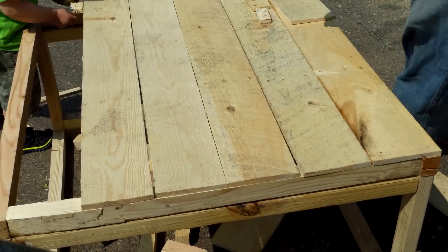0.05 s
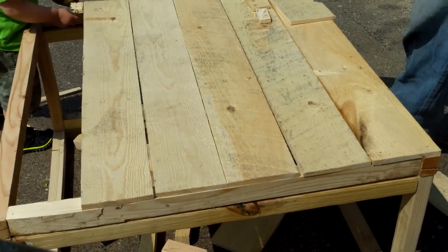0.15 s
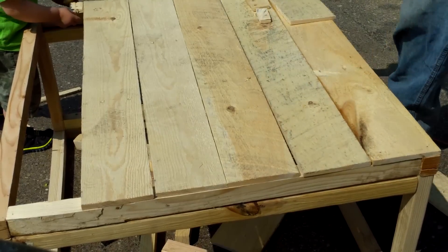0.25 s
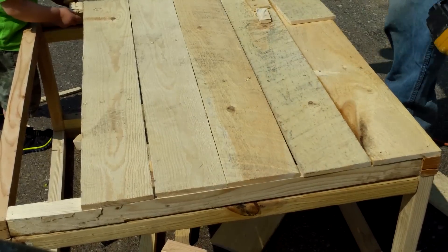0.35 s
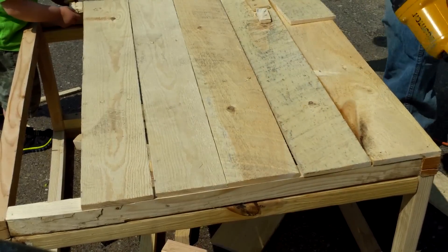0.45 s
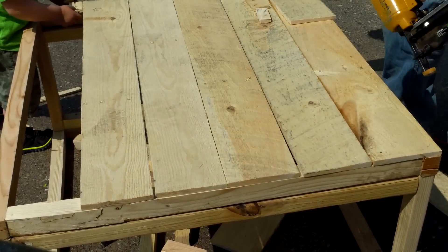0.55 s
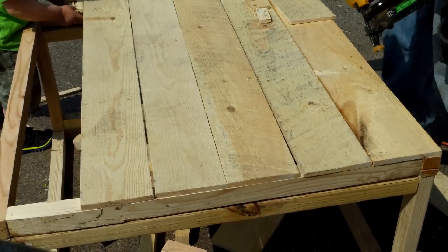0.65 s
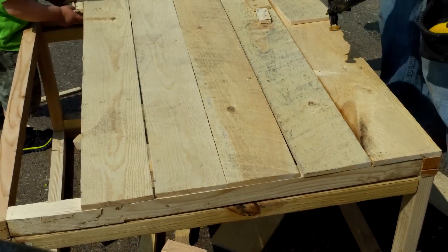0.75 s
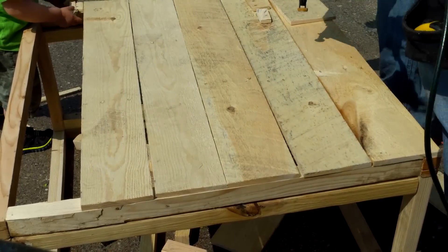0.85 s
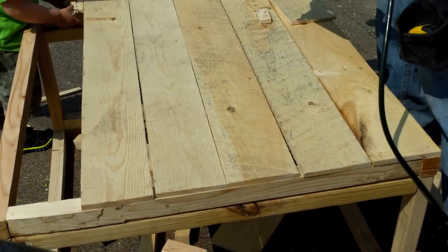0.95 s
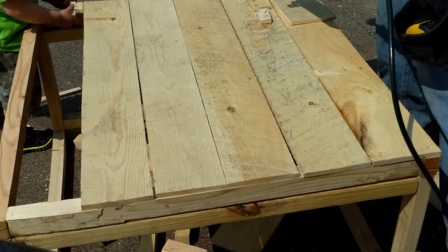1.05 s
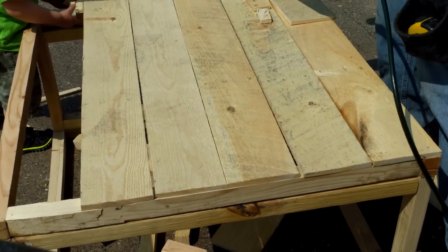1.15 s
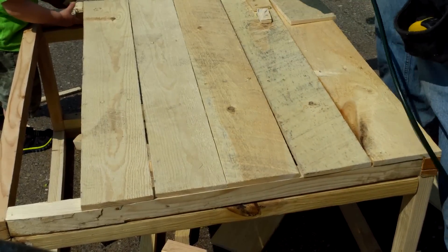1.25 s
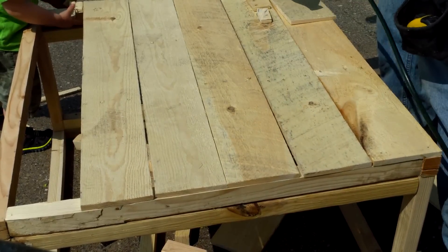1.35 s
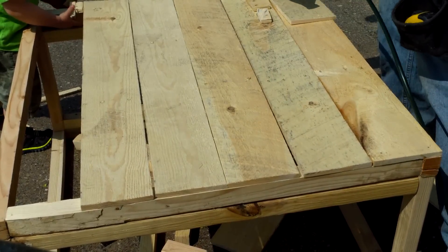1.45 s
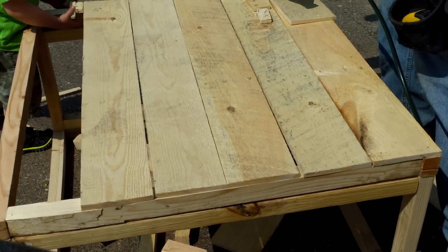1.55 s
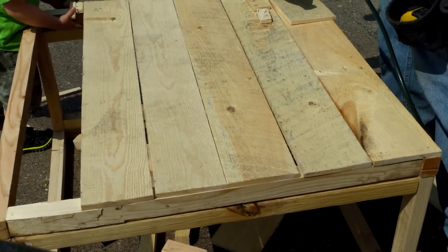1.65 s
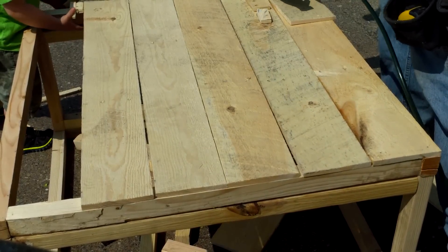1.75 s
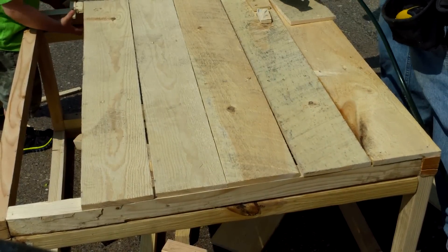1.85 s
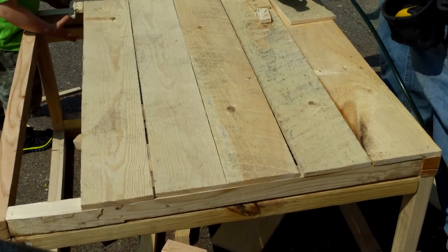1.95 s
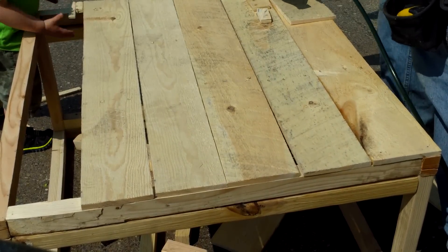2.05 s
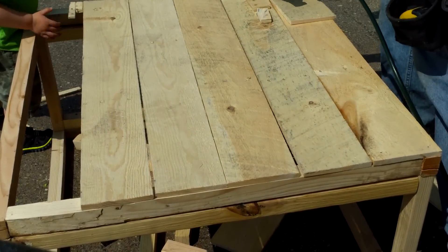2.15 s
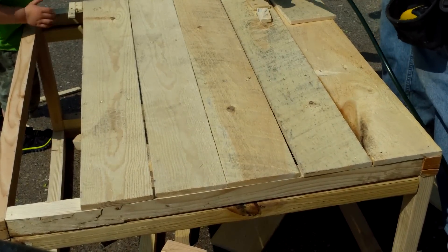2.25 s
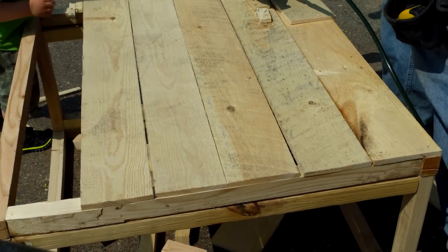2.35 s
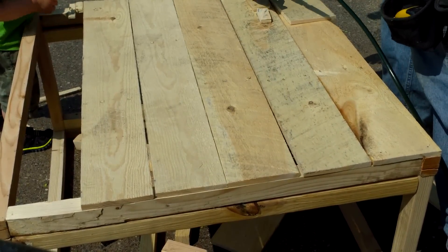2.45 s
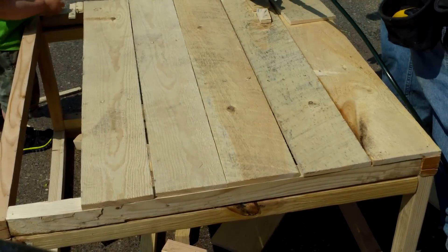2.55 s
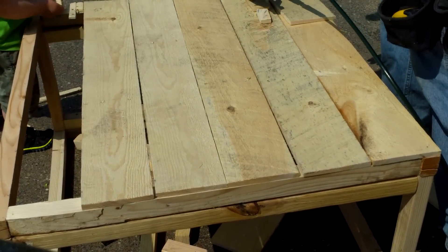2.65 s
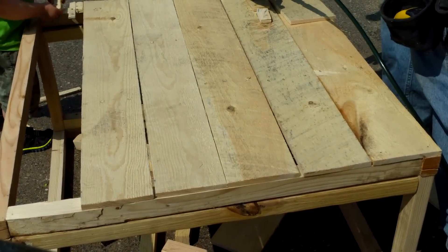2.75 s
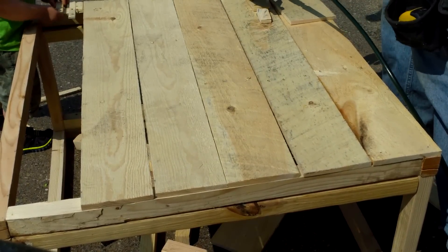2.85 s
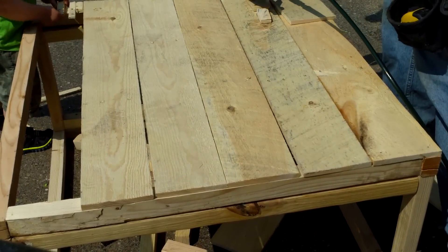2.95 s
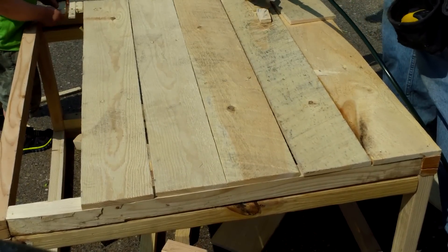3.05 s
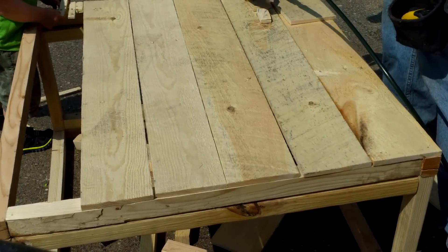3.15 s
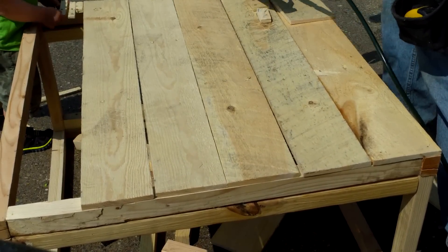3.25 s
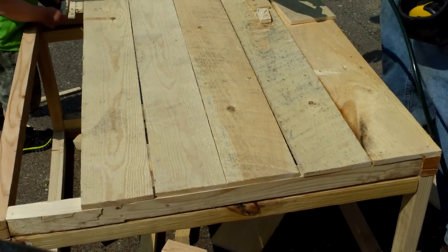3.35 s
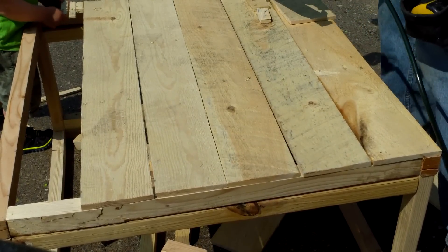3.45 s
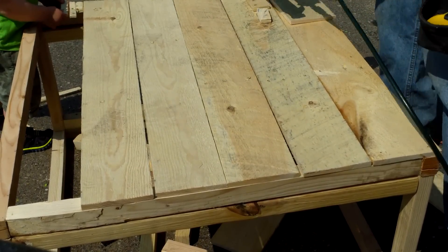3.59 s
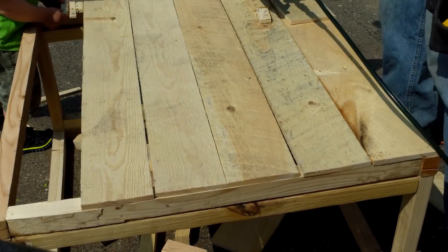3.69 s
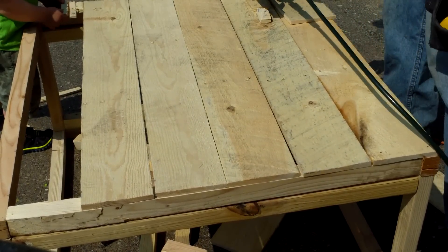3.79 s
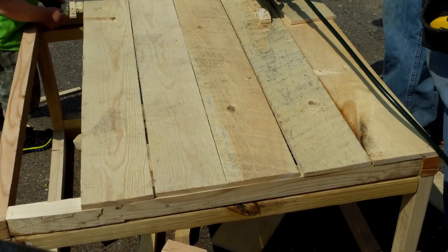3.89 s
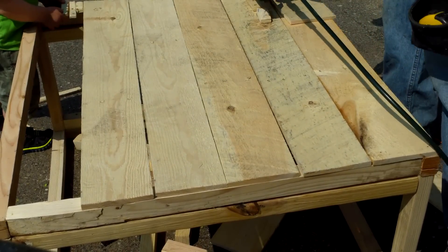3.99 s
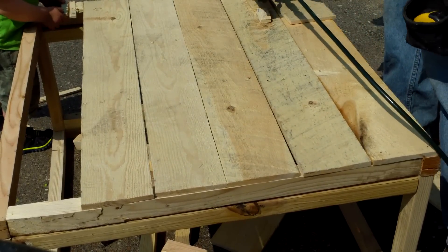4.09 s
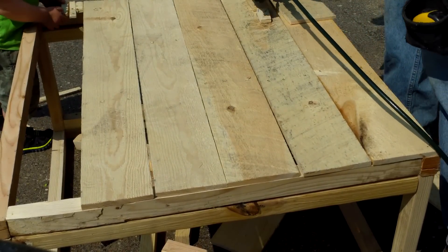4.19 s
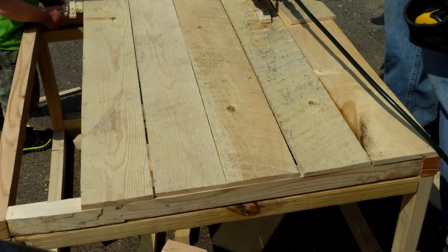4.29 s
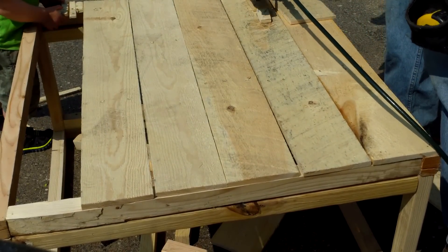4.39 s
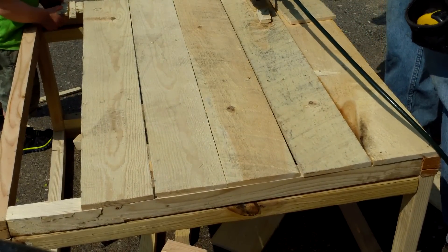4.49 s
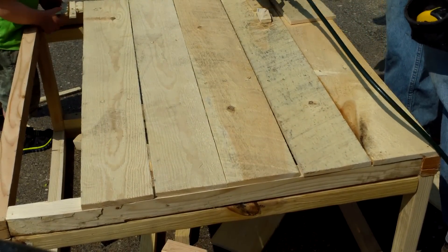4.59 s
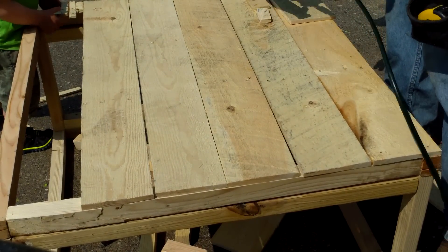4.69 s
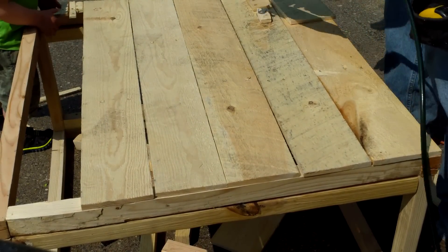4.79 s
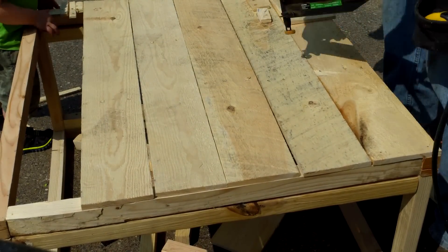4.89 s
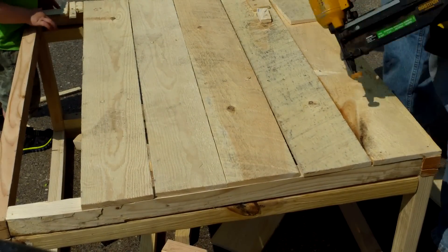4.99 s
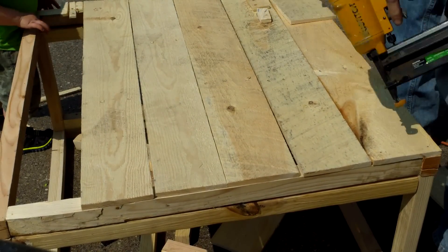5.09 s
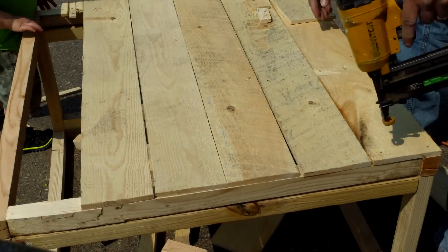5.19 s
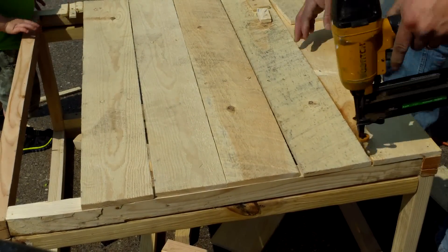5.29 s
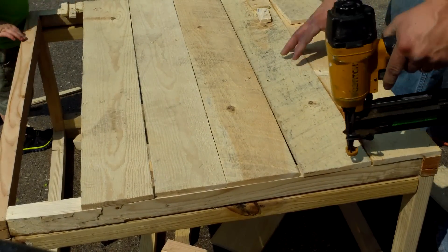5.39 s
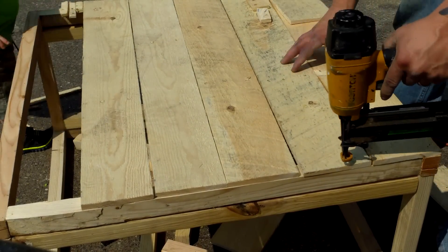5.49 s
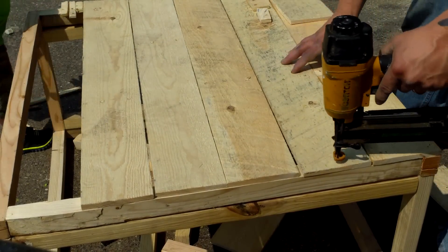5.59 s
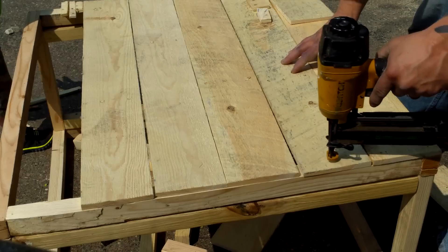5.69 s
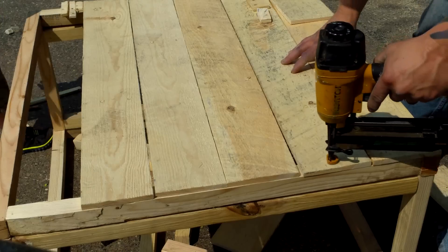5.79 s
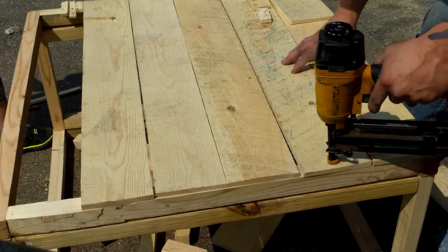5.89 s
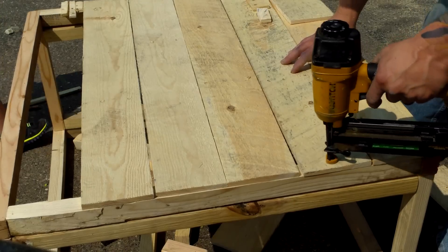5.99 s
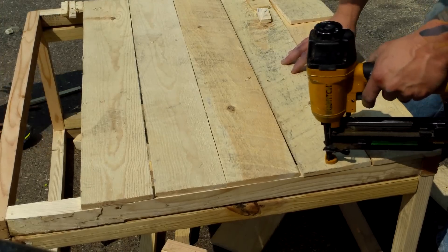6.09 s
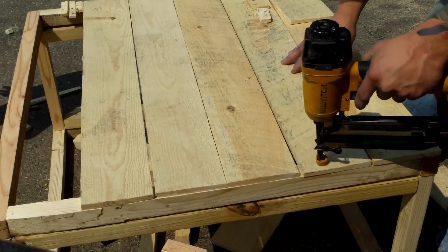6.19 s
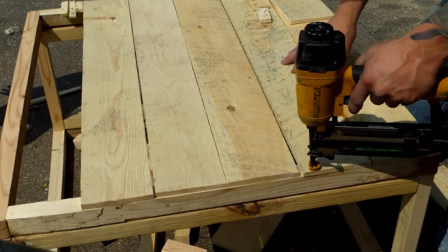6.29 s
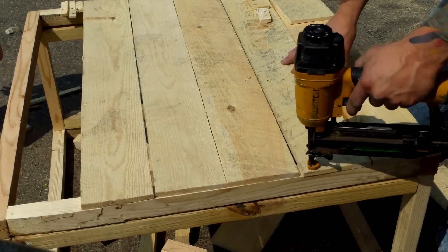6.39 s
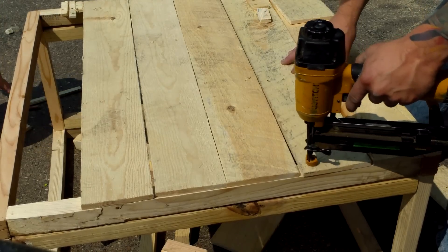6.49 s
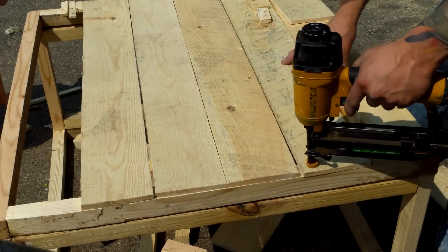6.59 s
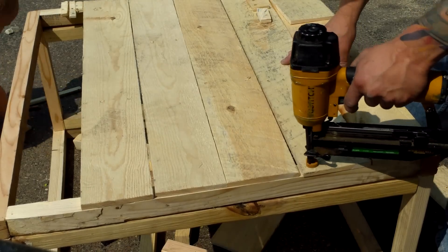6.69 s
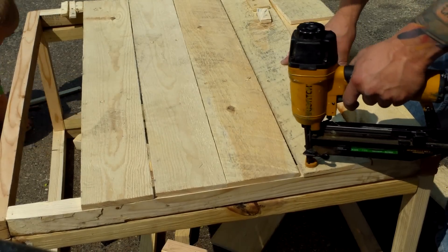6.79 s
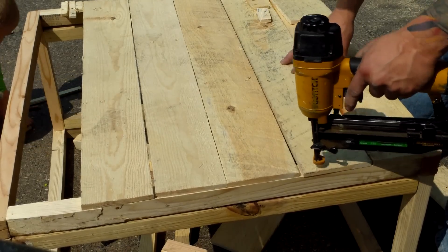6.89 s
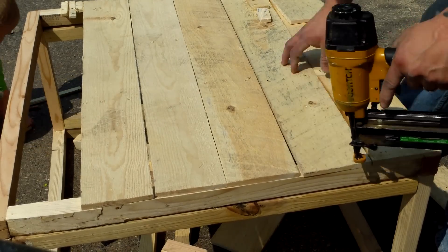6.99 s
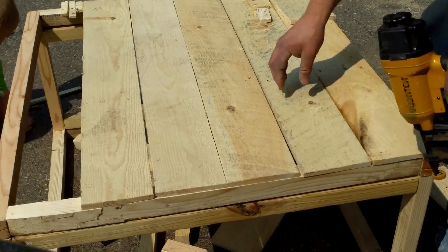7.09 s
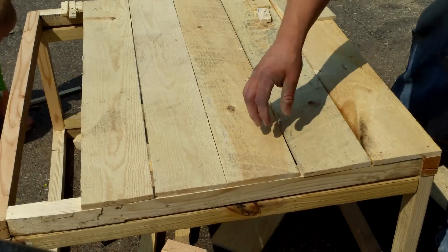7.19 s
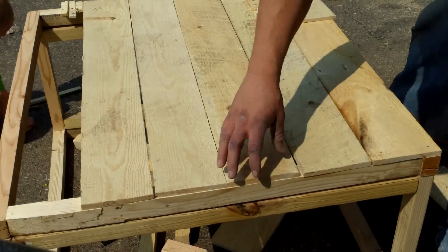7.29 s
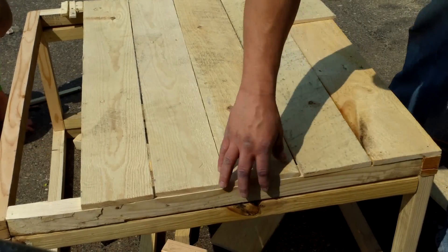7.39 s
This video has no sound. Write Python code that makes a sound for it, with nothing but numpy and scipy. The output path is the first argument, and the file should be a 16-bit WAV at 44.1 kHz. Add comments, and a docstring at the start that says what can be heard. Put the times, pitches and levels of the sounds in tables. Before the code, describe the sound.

Outdoors, close to a timber frame, the sound opens subdued with a wisp of dying air; a faint low engine drone and distant traffic swell up by about 0.5 s. From 0.65 to 1.1 s the tool's nose and hose knock, tick and scuff on the boards, with another knock at 1.8. A pneumatic nailer fires at 2.1, 3.3, 4.6, 6.2 and 6.9 s. Each shot is a brief inrush of air and valve knock, then two cracks almost fused, with short ringing wood and a little steel. About 0.15 s later comes a trigger click and a loud, bright, very short exhaust blast ending in a piston clack. The background ducks at every shot, then returns, growing fainter overall. Small knocks, ticks and soft rubbing fill the gaps, especially 5.3 to 6.1 s. After the last exhaust at 7.07 s, a thin metallic ring lingers. Echo is slight.

```python
"""On a timber frame outdoors, a pneumatic nailer drives five nails into boards.
Each shot is an inrush of air, a valve knock, two cracks of the driver and ringing wood and steel; then the
trigger clicks back and the exhaust blasts. Impacts are shaped noise plus decaying sines; air is shaped noise.
Between shots the tool knocks and rubs on the wood; an engine (wavering sines) and traffic drone far off.
Far sounds, rubbing and faint ticks sink at every shot, stay low for a moment and swell back."""
import sys
import numpy as np
from scipy import signal
from scipy.fft import rfft, irfft, next_fast_len
from scipy.io import wavfile

SR = 44100
rng = np.random.default_rng(int(sys.argv[2]) if len(sys.argv) > 2 else 0)


def file_out(sig):
    """Save sig as 16-bit WAV at sys.argv[1]."""
    # one column per channel
    cols = np.atleast_2d(sig).T
    # limit, then scale
    lim = np.clip(cols, -1, 1)
    pcm = np.round(lim * 32767).astype(np.int16)
    wavfile.write(sys.argv[1], SR, pcm)


N = 328104
TIME = np.arange(N) / SR   # [s]
AGE = np.arange(SR // 2) / SR   # time since the onset of one event [s]

# Levels in the tables are relative; the functions trim them further.
# Far sounds over time: (time [s], traffic level [dB], engine and rumble level [dB])
FAR_LEVELS = [(.7, -45, -31), (2.0, -46, -35.5), (3.0, -50, -38.5), (4.3, -52, -43), (5.8, -53.5, -44.5),
              (7.3, -57, -43.5)]
# Spectrum of distant traffic: (frequency [Hz], density [dB per Hz])
STREET_COLOUR = [(76, -28), (130, 5), (202, -3.5), (285, -5.5), (410, -6.5), (444, -9), (765, -3),
                 (935, -3), (1640, -8.5), (3990, -28), (8070, -32), (9670, -32), (16000, -37.5)]
# Spectrum of the low rumble: (frequency [Hz], density [dB per Hz])
RUMBLE_COLOUR = [(12, -37.5), (20, -7.5), (38, 4.5), (97, -4), (109, -4), (130, -30), (160, -18.5),
                 (210, -37.5), (350, -120)]
# Spectrum of the faint steady hiss: (frequency [Hz], density [dB per Hz])
HISS_COLOUR = [(59, -19.5), (100, 4), (119, -17), (350, -25.5), (854, -26), (991, -24.5), (16000, -34.5)]
# Tones of the far engine: (frequency [Hz], level [dB], waver as a share of the frequency [1])
ENGINE_TONES = [(92.9, -1.5, .018), (59.2, -8.5, 0.043), (205, -18, 0.0066)]
# Thin far whines: (lower edge [Hz], upper edge [Hz], level [dB])
WHINE_BANDS = [(7480, 7720, -27), (8520, 8620, -27)]
# Lull of the background: depth, and time constants of sinking and swelling back
LULL_DB, SINK_S, SWELL_S = -23, 0.0088, 0.072
FIRST_LULL_ENDS_S = 0.45   # the scene opens in a lull

# Spectrum of air bleeding out slowly: (frequency [Hz], density [dB per Hz])
BLEED_COLOUR = [(500, -12.5), (3000, -12.5), (5500, -6), (6800, -6.5), (7700, -4.5), (8400, -12),
                (9600, -0.5), (11500, -10), (15500, -19.5)]
# Spectrum of the thin tail scattered by the yard: (frequency [Hz], density [dB per Hz])
YARD_COLOUR = [(100, 7.0), (600, 6.5), (2000, 0.5), (5000, 0.5), (10000, -1), (16000, -4)]
# Low, barely audible pressure swells: (time of the peak [s], level [dB], time from peak to 1/e [s])
LOW_SWELLS = [(.03, -44, .11), (7.38, -33, .11)]
# Spectrum of the low swells: (frequency [Hz], density [dB per Hz])
LOW_SWELL_COLOUR = [(5, 0), (15, -6), (35, -14), (70, -26), (150, -42), (400, -62), (5000, -100)]

# Knocks of nose and hose on the boards:
# (time [s], wooden level [dB], metal tick level [dB], scuff level [dB], fade to 1/e [s])
KNOCK_EVENTS = [(0.6515, -38, -45, -44.5, 0.015), (0.7109, -32.5, -40, -31, 0.0037),
                (0.7287, -35, -62, -47, 0.016), (0.8764, -32.5, -28.5, -32, 0.0065),
                (0.9468, -57, -52, -38, 0.0099), (1.0049, -56, -40, -62, 0.005),
                (1.05, -39, -71, -68, .0071), (1.1106, -26.5, -38, -42.5, 0.0078),
                (1.828, -39, -35, -36, 0.012), (2.651, -50, -51, -55, 0.017),
                (3.1564, -42, -52.5, -54.5, 0.0095), (4.414, -48.5, -42.5, -56, 0.0033),
                (4.5342, -49, -45, -56, 0.011), (5.0377, -54, -59, -80, .0042),
                (5.3561, -43, -43.5, -44, 0.012), (5.5043, -47, -44.5, -47, 0.022),
                (5.9479, -44, -62, -38.5, .014), (6.0111, -48.5, -51, -66, .012),
                (6.1063, -42, -51.5, -43.5, 0.015), (6.7616, -61, -55, -53.5, 0.006),
                (6.8364, -51, -70, -78, .0078)]
# Spectra of wooden knock, metal tick and scuff, in that order: (frequency [Hz], density [dB per Hz])
KNOCK_SPECTRA = [
    [(200, -6.5), (600, -4.5), (950, 1.5), (1500, -1.5), (2300, -3), (4000, -10.5), (15000, -37)],
    [(1500, -24), (2800, -7), (3500, -9), (4100, -6.5), (4900, -10), (5600, 0), (6300, -4.5), (6900, -9),
     (7500, -2), (8600, -19), (15000, -25)],
    [(3000, -29), (7500, -8.5), (9600, 3.5), (11500, -7.5), (15500, -17.5)],
]
# Strokes of rubbing hose and clothes: (time of the peak [s], level [dB], fade to 1/e [s])
RUB_STROKES = [(.69, -48.5, 0.031), (.9, -43, 0.023), (1.66, -59.5, 0.055), (1.82, -47, 0.057),
               (3.12, -66, 0.093), (5.39, -55.5, 0.078), (5.94, -51, .09), (6.13, -50, 0.035),
               (7.0, -44.5, 0.067)]
RUB_REST_DB = -67.5   # between strokes
# Spectrum of the rubbing: (frequency [Hz], density [dB per Hz])
RUSTLE_COLOUR = [(1470, -37), (2500, -7), (4730, -6.5), (6060, -4), (8270, -8), (9360, 0), (16000, -17)]
# Faint ticks at chance times
TICK_COUNT, TICK_SPREAD_DB, TICK_FADE_S = 30, 4, 0.0042
# Parts of one faint tick: (wooden level [dB], metal level [dB], scuff level [dB])
TICK_LEVELS = (-58, -57, -59)
# Modes of the boards: (frequency [Hz], level [dB], decay by 60 dB [s])
BOARD_MODES = [(231.8, -22, 0.029), (414, -19.5, 0.018), (690, -18, 0.036), (794, -14, 0.033),
               (950, -20.5, .1), (1135, -18.5, 0.11), (1300, -8.5, 0.046), (1605, 3, 0.024),
               (1755, -1, .025), (2030, 2.5, 0.024), (2080, -7, 0.0092), (2548, -5.5, 0.027),
               (2890, -5.5, 0.023)]

# Shots: (time [s], air level [dB], crack level [dB], wood level [dB], note of that spot on the boards [Hz],
# note level [dB], steel level [dB], driver's ping level [dB], end of the lull after the strike [s])
SHOT_EVENTS = [(2.1096, -21, -13.5, -16.5, 1695, -20.5, -33, -41.5, 0.43),
               (3.2810, -20.5, -14.5, -7.5, 1268, -17.5, -33, -40, 0.61),
               (4.6294, -22, -15, -14, 1587, -18.5, -34.5, -51.5, 0.41),
               (6.1751, -23, -13, -15, 1417, -18.5, -35, -26.5, 0.53),
               (6.923, -23.5, -12, -15.5, 1750, -21, -33, -26.5, 0.2)]
# Delays from the driver's strike, the same at every shot
INRUSH_AT_S, VALVE_AT_S, HOME_AT_S = -.0233, -.0183, .0036
# Spectrum of the air inrush: (frequency [Hz], density [dB per Hz])
INRUSH_COLOUR = [(150, -21.5), (900, -29), (1400, -25), (2000, -22), (2900, -12.5), (4300, -14),
                 (5300, -16), (6200, 1.5), (6900, -16), (7700, -11), (8400, -12), (9600, 0), (11500, -12.5),
                 (15500, -17.5)]
# Spectrum of the valve knock: (frequency [Hz], density [dB per Hz])
VALVE_COLOUR = [(80, -3.5), (300, 2.5), (900, 4), (1800, -10.5), (2900, -5), (4500, -15.5), (9500, 2),
                (15000, -13.5)]
# Spectrum of the driver's crack: (frequency [Hz], density [dB per Hz])
CRACK_COLOUR = [(80, -11.5), (300, -3), (800, -6), (1700, 4), (3000, -3.5), (4500, 0), (6000, 3),
                (6600, -1.5), (7700, 6.5), (8400, -8), (9400, 9), (11500, -5), (15500, -7.5)]
# The steel body's clear note, a close pair that beats: (frequency [Hz], level [dB], decay by 60 dB [s])
BODY_NOTE_MODES = [(1852, 3, .27), (1886, -4, .18)]
# Higher modes of the steel: (frequency [Hz], level [dB], decay by 60 dB [s])
STEEL_MODES = [(4110, -21.5, 0.8), (6440, -10.5, 0.18), (7100, -16.5, .4), (7144, -10, 0.14),
               (9450, -7, .1)]
# Ping of the driver: (frequency [Hz], level [dB], decay by 60 dB [s])
DRIVER_MODES = [(10600, 0.5, 0.14), (14700, -4, .08)]

# Exhausts: (time [s], trigger click level [dB], blast level [dB], blast fade to 1/e [s], piston level [dB])
RELEASE_EVENTS = [(2.2666, -27, -9, 0.02, -24), (3.4248, -27, -11, 0.023, -21),
                  (4.7750, -29.5, -14, 0.02, -19), (6.3068, -29, -8.5, 0.028, -17.5),
                  (7.0705, -21.5, -7, 0.024, -18.5)]
# Delays from the start of the exhaust, the same every time
TRIGGER_AT_S, PISTON_AT_S, BOUNCE_AT_S = -.0208, .0327, .036
# Spectrum of the trigger click: (frequency [Hz], density [dB per Hz])
TRIGGER_COLOUR = [(200, -25.5), (1000, -23.5), (1800, -7.5), (2500, -2.5), (3400, -14.5), (5000, -9.5),
                  (6500, -6.5), (7700, -6.5), (8500, -9), (9600, 0.5), (15000, -18.5)]
# Modes of the trigger valve's seat: (frequency [Hz], level [dB], decay by 60 dB [s])
TRIGGER_SEAT_MODES = [(2540, 0, .016), (2280, -6, .011), (2740, -10, .01)]
# Spectrum of the exhaust blast: (frequency [Hz], density [dB per Hz])
EXHAUST_COLOUR = [(100, -17), (500, -26.5), (1000, -21), (2600, -17.5), (3500, -14), (4100, -7),
                  (5000, -10.5), (6400, -10.5), (7700, -5), (8400, -10.5), (9400, 1.5), (11000, -6),
                  (15500, -12)]
# Spectrum of the piston meeting its stop: (frequency [Hz], density [dB per Hz])
PISTON_COLOUR = [(80, -16), (300, -7.5), (750, -3.5), (1030, -12), (1400, 4.5), (1900, -5), (2600, -13),
                 (5000, -10), (9500, -6), (15000, -14)]

# Tones of the long metallic ring of the magazine spring: (frequency [Hz], level [dB])
SPRING_TONES = [(1814, 1), (2907, -14.5), (4107, 0), (4603, -10), (6961, -11)]
# Swells of the long metallic ring: (time [s], level [dB])
RING_SWELLS = [(6.93, -55), (7.075, -50.5), (7.26, -55)]
RING_RISE_S, RING_T60_S = 0.011, 0.83   # rise time constant, decay by 60 dB


def from_db(db):
    """Logarithmic level: 20 dB is a factor of ten in amplitude."""
    return 10 ** (np.asarray(db) / 20)


def rms_one(x):
    """Normalization: divide by the root mean square to get unit power."""
    return x / np.sqrt(np.mean(x ** 2) + 1e-20)


def in_time(rows):
    """Linear interpolation of each column of a curve, sample by sample."""
    s, *columns = np.transpose(rows)
    return [np.interp(TIME, s, column) for column in columns]


def add(track, s, sound):
    """Superposition: a sound is summed into the track from a given time."""
    at = int(s * SR)
    track[at:at + len(sound)] += sound[:N - at]


def noise(colour, size):
    """Spectral shaping: white noise is weighted by frequency and scaled to unit power."""
    hz, db = np.transpose(colour)
    length = next_fast_len(size)
    bins_hz = np.fft.rfftfreq(length, 1 / SR) + 1   # the offset keeps the logarithm finite
    gain = from_db(np.interp(np.log(bins_hz), np.log(hz), db))
    gain = gain * np.minimum(bins_hz / hz[0], 1) ** 2   # extra roll-off below the first row
    white = rng.standard_normal(length)
    return rms_one(irfft(gain * rfft(white), length)[:size])


def drift(rate):
    """Slow random modulation: straight lines join random points, rate per second; unit power."""
    return rms_one(np.interp(TIME * rate, np.arange(N), rng.standard_normal(N)))


def band(x, low_hz, high_hz):
    """Band-pass filtering: only the range between two edges is kept."""
    edges = [low_hz, min(high_hz, .45 * SR)]
    return signal.sosfilt(signal.butter(2, edges, "band", fs=SR, output="sos"), x)


def burst(colour, rise, fade):
    """Transient noise: a dense rattle or puff rises and decays exponentially."""
    return noise(colour, len(AGE)) * (1 - np.exp(-AGE / rise)) * np.exp(-AGE / fade)


def shut(after, closing):
    """Throttled flow: a valve stays open for a while, then closes exponentially."""
    return np.exp(-np.maximum(AGE - after, 0) / closing)


def ring(modes):
    """Modal synthesis: a blow excites decaying sines, each with a slightly random strength."""
    total = 0
    for k, (hz, db, t60) in enumerate(modes):
        envelope = from_db(db + rng.normal() - 60 * AGE / t60)
        total = total + envelope * (-1) ** k * np.sin(2 * np.pi * hz * AGE)
    return total


def swell(s, fade):
    """Symmetric exponential envelope: rises to 1 at a given time and falls away again."""
    return np.exp(-np.abs(TIME - s) / fade)


def low_until(end):
    """Exponential recovery: 1 up to a given time, then a decay towards 0."""
    return np.exp(-np.maximum(TIME - end, 0) / SWELL_S)


def lulls():
    """Gain envelope of the background: drops as the air rushes in, stays low, then swells back."""
    sunk = low_until(FIRST_LULL_ENDS_S)
    for s, *_, lull in SHOT_EVENTS:
        sinking = 1 - np.exp(-np.maximum(TIME - s - INRUSH_AT_S, 0) / SINK_S)
        sunk = np.maximum(sunk, sinking * low_until(s + lull))
    return from_db(LULL_DB * sunk)


def engine():
    """Frequency and amplitude modulation: sines of wandering pitch and strength make a drone."""
    drone = 0
    for hz, db, waver in ENGINE_TONES:
        turns = hz * np.cumsum(1 + waver * drift(rate=16)) / SR
        drone = drone + from_db(db + 0.79 * drift(rate=22)) * np.sin(2 * np.pi * turns)
    return drone


def whines():
    """Narrow-band noise: a thin band of white noise is heard as an airy whine."""
    return sum(from_db(db) * rms_one(band(rng.standard_normal(N), low_hz, high_hz))
               for low_hz, high_hz, db in WHINE_BANDS)


def outdoors():
    """Incoherent addition: far traffic, rumble, engine and whines lie over a steady faint hiss."""
    street_db, low_db = in_time(FAR_LEVELS)
    low = from_db(-4.0) * noise(RUMBLE_COLOUR, N) + from_db(-3) * engine()
    street = from_db(1.8 * drift(rate=18)) * noise(STREET_COLOUR, N) + whines()
    far = from_db(street_db) * street + from_db(low_db) * low
    return lulls() * far + from_db(-65.5) * noise(HISS_COLOUR, N)


def earlier_air():
    """Turbulent outflow: air from an earlier shot is still dying away at the start."""
    out = np.zeros(N)
    add(out, 0, from_db(-41.5) * burst(BLEED_COLOUR, rise=0.00064, fade=.045))
    return out


def yard(x, echo_db, t60):
    """Diffuse reflection: ground, timber and far walls scatter back a thin tail, made by convolution."""
    tail = noise(YARD_COLOUR, len(AGE)) * from_db(-60 * AGE / t60) * (1 - np.exp(-AGE / 0.0053))
    tail = tail / np.sqrt(np.sum(tail ** 2))   # unit energy
    return from_db(echo_db) * signal.fftconvolve(x, tail)[:N]


def low_swells():
    """Pressure fluctuation: very low noise swells, barely audible, at the start and near the end."""
    level = sum(from_db(db) * np.exp(-((TIME - s) / half) ** 2) for s, db, half in LOW_SWELLS)
    return level * noise(LOW_SWELL_COLOUR, N)


def knock(levels_db, fade):
    """Impact excitation: a snap and short rattle of wood, metal and scuff set the boards ringing."""
    snap = 1 + from_db(6.0) * np.exp(-AGE / 0.00051)
    rattle = sum(from_db(db + 0.5) * burst(colour, rise=0.000067, fade=max(fade, .001))
                 for colour, db in zip(KNOCK_SPECTRA, levels_db))
    return snap * rattle + from_db(levels_db[0] - 9.5) * ring(BOARD_MODES)


def knocks():
    """Repeated impact: the tool's nose and hose knock on the boards."""
    out = np.zeros(N)
    for s, *levels_db, fade in KNOCK_EVENTS:
        add(out, s, knock(levels_db, fade))
    return out


def rubbing():
    """Friction noise: hose and clothes rub in grainy strokes that swell and fade."""
    grain = rms_one(from_db(5 * np.minimum(drift(rate=330), 2.5)))
    strokes = from_db(RUB_REST_DB) + sum(from_db(db) * swell(s, fade) for s, db, fade in RUB_STROKES)
    return strokes * grain * noise(RUSTLE_COLOUR, N)


def ticks():
    """Random impact: faint ticks fall at chance times with chance strengths."""
    out = np.zeros(N)
    for when, strength in rng.random((TICK_COUNT, 2)):
        gain = from_db(TICK_SPREAD_DB * (2 * strength - 1.5))
        add(out, when * TIME[-1], gain * knock(TICK_LEVELS, TICK_FADE_S))
    return out


def handling():
    """Superposition of knocks at full level with rubbing and ticks that sink in the lulls."""
    return knocks() + lulls() * (rubbing() + ticks())


def shots():
    """Pneumatic impact: air fills the cylinder, the valve knocks, the driver meets the nail and bottoms out."""
    out = np.zeros(N)
    for s, air_db, crack_db, wood_db, note_hz, note_db, steel_db, ping_db, _ in SHOT_EVENTS:
        # the inrush is cut off from the moment of the strike
        inrush = burst(INRUSH_COLOUR, rise=0.00064, fade=0.046) * shut(-INRUSH_AT_S, closing=.004)
        add(out, s + INRUSH_AT_S, from_db(air_db - 2.0) * inrush)
        valve = burst(VALVE_COLOUR, rise=0.00025, fade=0.0028) * shut(0.0015, closing=0.001)
        add(out, s + VALVE_AT_S, from_db(air_db + 12.0) * valve)
        # the driver meets the nail
        add(out, s, from_db(crack_db + 2) * burst(CRACK_COLOUR, rise=0.00068, fade=0.004))
        add(out, s, from_db(note_db + 4.5) * ring([(note_hz, 0, .014)]))
        # the driver bottoms out on the boards
        home = s + HOME_AT_S
        add(out, home, from_db(crack_db + 7.0) * burst(CRACK_COLOUR, rise=0.00064, fade=0.0044))
        add(out, home, from_db(wood_db) * ring(BOARD_MODES))
        add(out, home, from_db(note_db) * ring([(note_hz, 0, .035)]))
        add(out, home, from_db(steel_db) * ring(BODY_NOTE_MODES + STEEL_MODES))
        add(out, home, from_db(ping_db) * ring(DRIVER_MODES))
    return out


def releases():
    """Venting: the trigger snaps back, the cylinder empties, and the piston meets its stop with one bounce."""
    out = np.zeros(N)
    for s, click_db, blast_db, blast_fade, piston_db in RELEASE_EVENTS:
        click = burst(TRIGGER_COLOUR, rise=0.00033, fade=.0025) + ring(TRIGGER_SEAT_MODES)
        add(out, s + TRIGGER_AT_S, from_db(click_db + 3.5) * click)
        blast = burst(EXHAUST_COLOUR, rise=.0026, fade=blast_fade) * shut(.029, closing=.0055)
        add(out, s, from_db(blast_db + 0.5) * blast)
        # the last of the air bleeds out slowly
        add(out, s, from_db(-34) * burst(BLEED_COLOUR, rise=0.016, fade=0.052))
        stop = burst(PISTON_COLOUR, rise=.0002, fade=0.002)
        add(out, s + PISTON_AT_S, from_db(piston_db + 6.0) * stop)
        bounce = burst(PISTON_COLOUR, rise=0.00035, fade=0.0049)
        add(out, s + BOUNCE_AT_S, from_db(piston_db - 3.0) * bounce)
        add(out, s + PISTON_AT_S, from_db(piston_db - 34.5) * ring(BODY_NOTE_MODES + STEEL_MODES))
    return out


def spring():
    """Additive synthesis: steady high tones of the magazine spring swell and linger after the last shot."""
    tones = sum(from_db(db + 1.45 * drift(rate=14)) * np.sin(2 * np.pi * hz * TIME)
                for hz, db in SPRING_TONES)
    level = np.zeros(N)
    for s, db in RING_SWELLS:
        add(level, s, from_db(db - 60 * AGE / RING_T60_S) * (1 - np.exp(-AGE / RING_RISE_S)))
    return level * tones


def scene():
    """Superposition: the nailer and its echoes, the lingering ring, the far sounds and two low swells."""
    tool = earlier_air() + handling() + shots() + releases()
    mix = tool + yard(tool, echo_db=-21, t60=0.2) + spring() + outdoors() + low_swells()
    return mix[None]


def record(dry):
    """Saturation and low-pass filtering: the loudest peaks are squashed and the top is cut."""
    ceiling, cutoff_hz = .5, 16000
    squashed = ceiling * np.tanh(dry / ceiling)
    return signal.sosfiltfilt(signal.ellip(8, .1, 50, cutoff_hz, fs=SR, output="sos"), squashed)


dry = scene()
out = record(dry)
file_out(out)
```